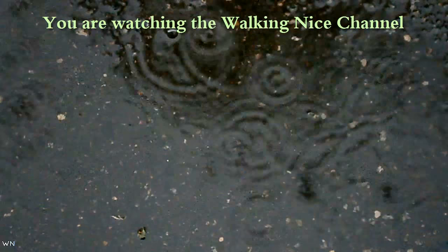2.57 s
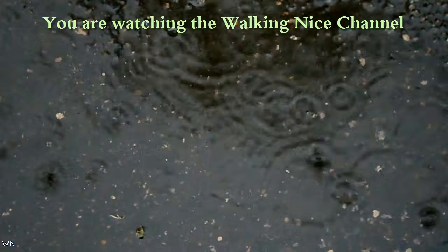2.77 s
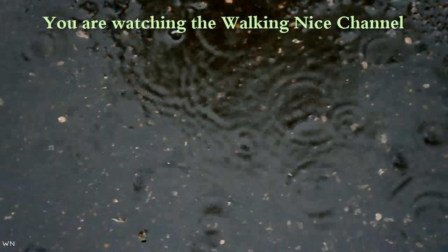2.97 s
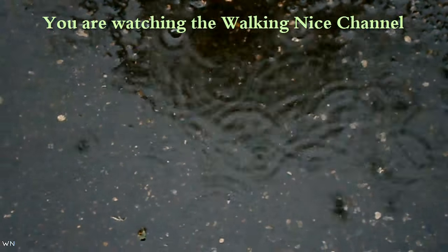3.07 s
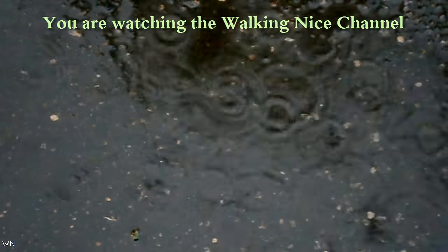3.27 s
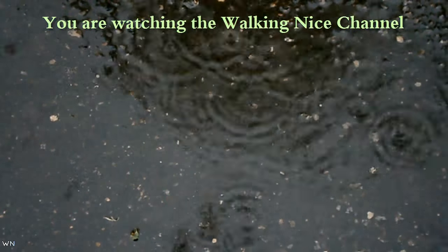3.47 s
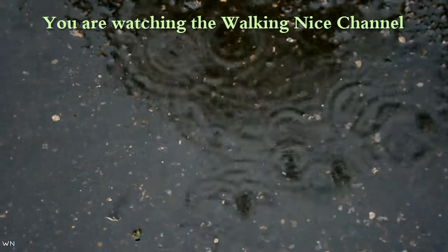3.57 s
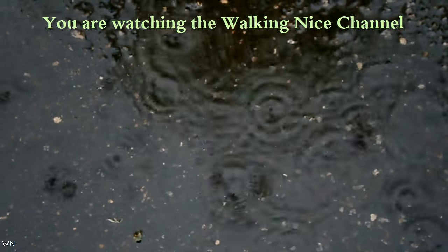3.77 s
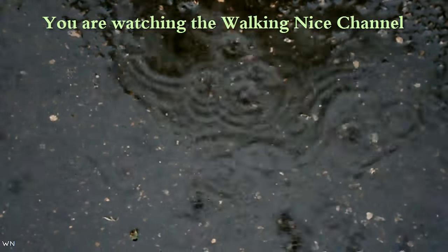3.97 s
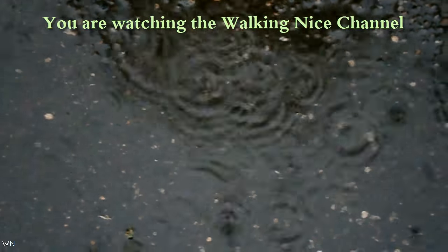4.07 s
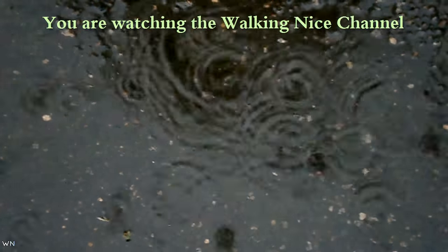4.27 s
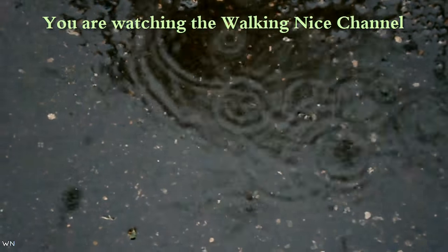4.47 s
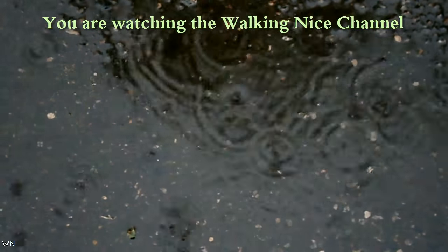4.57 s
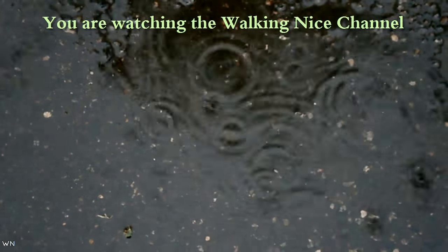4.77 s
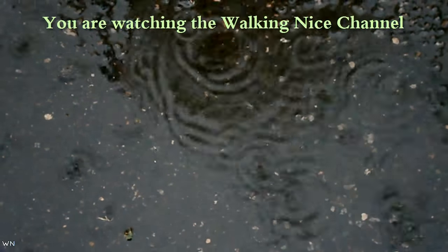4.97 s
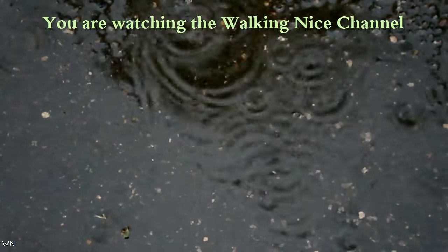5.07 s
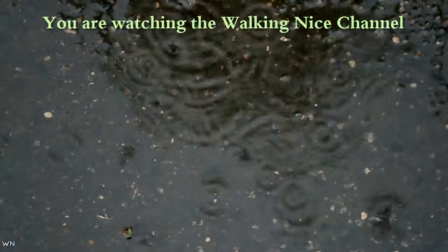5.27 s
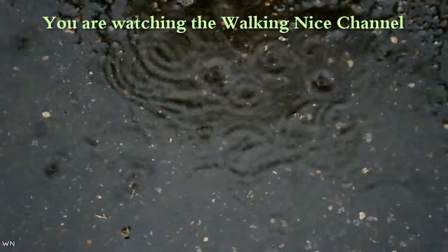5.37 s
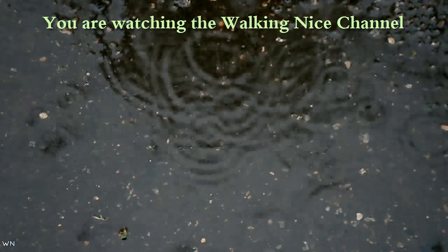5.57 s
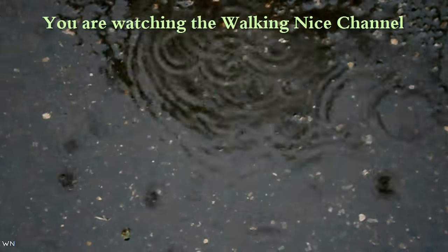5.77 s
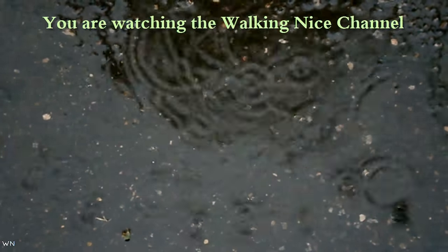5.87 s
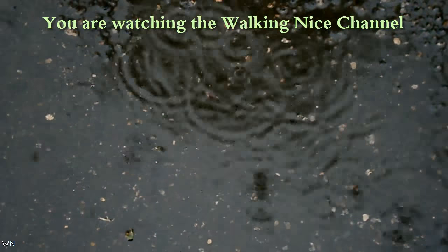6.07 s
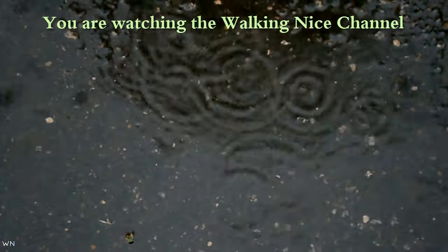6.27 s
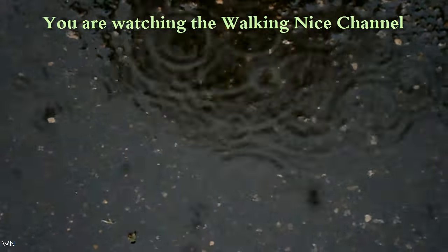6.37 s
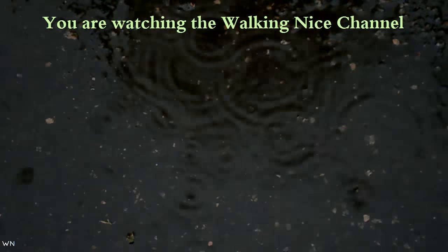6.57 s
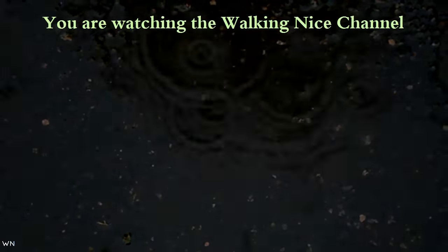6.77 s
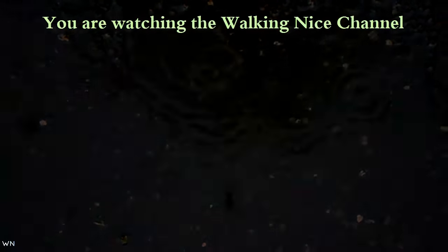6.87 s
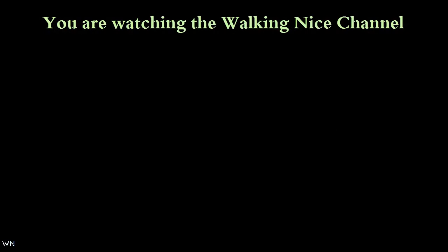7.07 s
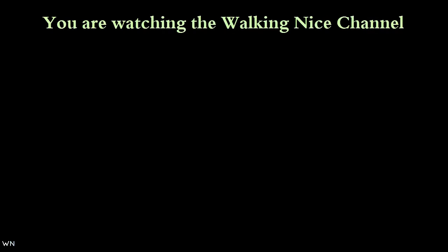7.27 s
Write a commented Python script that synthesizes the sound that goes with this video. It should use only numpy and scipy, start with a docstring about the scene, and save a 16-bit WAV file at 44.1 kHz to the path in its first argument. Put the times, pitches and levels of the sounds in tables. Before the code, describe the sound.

Outdoors, close mono pickup of rain on pavement: a continuous crackling patter, many sharp bright drop ticks with little sprays, lower wet splats in a puddle and occasional blunt thuds. Faint rising bubble blips surface briefly. A soft wash of distant rain stays underneath. The tone is coarse and grainy, like a cheap recorder, with no echo. The rain holds steady, then fades gradually until nothing remains.

```python
"""Steady rain on wet asphalt

Rain patters on asphalt and into a puddle, close to the microphone, and slowly fades out.
Near drops are short noise bursts that tick, splat and throw spray over a soft noise wash of rain further off.
A few heavy drops add a thud, made of one short push; trapped air bubbles ring as rising sine tones.
The recorder takes only 8000 samples a second and holds each one, which mirrors the ticks into a gritty treble."""
import sys
import numpy as np
from scipy import signal
from scipy.io import wavfile
from scipy.ndimage import uniform_filter1d, map_coordinates

SR = 44100
rng = np.random.default_rng(int(sys.argv[2]) if len(sys.argv) > 2 else 0)


def digitize_waveform(pressure):
    """Quantize a signal to 16-bit integers and store it at the path in sys.argv[1].

    Rows of a 2-D input are taken as channels; values are limited to [-1, 1].
    """
    field = np.atleast_2d(pressure).T
    bounded = np.clip(field, -1, 1)
    quanta = np.round(bounded * 32767).astype(np.int16)
    wavfile.write(sys.argv[1], SR, quanta)


N = 322812
TIME = np.arange(N) / SR

# All levels below are set before the recorder's overload and fade.
# Colour of the rain further off, overall level set apart: (frequency [Hz], relative level [dB])
WASH_COLOUR = [(15, -9), (35, -12.5), (100, -6.5), (220, -5), (420, -4.5), (750, 0.5), (1250, 1.5),
               (1520, -3), (2100, -0.5), (2600, -1.5), (3400, -3.5), (4000, 7), (4400, -48), (6000, -83)]
# Colour of a drop on wet asphalt, overall level set apart: (frequency [Hz], relative level [dB])
TICK_COLOUR = [(100, -31.5), (1500, -19.5), (2300, -14), (2600, -9.5), (2900, -5.5), (3400, 1), (3700, 2.5),
               (3900, 1.5), (4100, -18), (4400, -31.5), (6000, -69)]
# Colour of a drop in the puddle, overall level set apart: (frequency [Hz], relative level [dB])
SPLAT_COLOUR = [(40, -33.5), (300, -12), (900, -11.5), (1500, -1.5), (2200, 6), (2650, -8.5), (3300, 14),
                (4400, -45.5), (6000, -68.5)]
# Brief lulls in the near rain: (middle time [s], change in level [dB])
LULLS = [(0.47, -3.5), (0.66, -1), (1.41, -4), (1.95, -6), (2.45, -5), (2.63, -4.5), (4.35, -0.5),
         (4.94, -7.5), (5.27, -2.5), (5.63, -4.5)]
# How hard the small drops splash in the puddle: (time [s], level against the patter [dB])
PUDDLE_LEVEL = [(0, -13), (2.6, -13.5), (3.0, -8.5), (3.7, -9.5), (4.2, -11.5), (5.0, -16), (7.2, -7)]
# Air bubbles trapped in the puddle: (time [s], starting pitch [Hz], level [dB])
BUBBLES = [(1.472, 940, -33), (1.574, 753, -33), (1.722, 1025, -35), (1.76, 667, -28.5), (1.79, 872, -32),
           (2.872, 1950, -30), (3.839, 1250, -29), (5.37, 1660, -31), (5.408, 1590, -29),
           (5.527, 1290, -32), (5.76, 1630, -30), (6.271, 996, -29), (6.505, 1127, -26), (6.656, 1690, -32),
           (6.697, 1916, -28)]
# Heavy drops that land with a smack: (time [s], peak of the push [dB], length of the push [s])
THUDS = [(0.7499, -10, 0.00046), (2.3127, -22, 0.00056), (3.1393, -10.5, 0.00055), (3.2345, -18, 0.00033),
         (3.6686, -12.5, 0.0007), (4.859, -22, 0.00042), (6.8097, -11.5, .00035), (6.8176, -9, 0.00034)]
# The biggest near drops on the asphalt, before a shared boost: (time [s], level [dB])
BIG_TICKS = [(0.0775, -20), (0.0869, -33), (0.1946, -22.5), (0.3613, -22), (0.374, -23.5), (0.5945, -28),
             (0.7484, -20), (0.7731, -18), (0.8487, -25), (0.8772, -23), (1.095, -20), (1.125, -19),
             (1.1642, -21.5), (1.207, -20), (1.3084, -20.5), (1.4668, -24), (1.6172, -22), (1.6584, -22),
             (1.7369, -23), (1.8037, -20.5), (2.0117, -21), (2.2533, -23.5), (2.2939, -20), (2.3113, -19),
             (2.3903, -22), (2.5046, -22.5), (2.5563, -24), (2.588, -21.5), (2.8643, -17.5),
             (2.9063, -19.5), (3.0024, -19), (3.139, -18), (3.2021, -21.5), (3.2333, -21), (3.24, -20),
             (3.2561, -22), (3.2758, -18.5), (3.289, -21), (3.6676, -19), (3.6952, -21.5), (3.7607, -20.5),
             (3.8394, -23), (3.8909, -23.5), (3.9957, -24), (4.0142, -24.5), (4.032, -25), (4.0678, -24.5),
             (4.2655, -23.5), (4.3999, -18.5), (4.4274, -21), (4.4523, -23), (4.4969, -22.5), (4.6215, -20),
             (4.7844, -23.5), (4.8588, -19.5), (5.066, -21.5), (5.15, -21.5), (5.1583, -20.5),
             (5.3459, -20), (5.3838, -21.5), (5.4588, -22), (5.8125, -18.5), (5.8493, -22.5),
             (5.8846, -18.5), (5.9919, -21.5), (6.147, -15.5), (6.3765, -20.5), (6.5907, -22),
             (6.8187, -15.5)]
# The biggest near drops in the puddle: (time [s], level [dB])
BIG_SPLATS = [(0.0858, -26), (0.7491, -22), (0.849, -27), (1.2908, -23), (1.5281, -23), (1.6128, -22.5),
              (2.165, -25.5), (2.217, -21.5), (2.8769, -24.5), (2.9092, -34), (3.0018, -35), (3.1393, -24),
              (3.2344, -21), (3.524, -25), (3.6682, -21), (3.7175, -30), (5.0667, -25), (6.8083, -19)]

WASH_DB, PATTER_DB = -37, -31
LULL_S = 0.03  # a lull lasts about this long on either side of its middle
MIDDLING_PER_S, MIDDLING_SOFTEST_DB, MIDDLING_RANGE_DB = 19, -27.5, 4
SPRAY_LATEST_S, SPRAY_DB = 0.016, -6  # latest landing after the drop, level against the drop's table level
HOLD_HZ, EDGE_HZ = 8000, 15780  # the recorder's sample rate and its upper band limit


def gain_of(db):
    """Turns decibels into a multiplier for the wave."""
    return 10 ** (np.asarray(db) / 20)


def evened(x):
    """Scales a signal so that its average strength (rms) is 1."""
    return x / np.sqrt(np.mean(x ** 2) + 1e-20)


def colour_db(colour, hz):
    """Reads a colour table at any frequency, in even steps of pitch rather than of Hz."""
    table_hz, table_db = np.transpose(colour)
    return np.interp(np.log(hz + 1), np.log(table_hz + 1), table_db)


def add(mix, start_s, sound):
    """Mixes a sound in at its start time, cut off where the mix ends."""
    part = mix[max(round(start_s * SR), 0):][:len(sound)]
    part += sound[:len(part)]


def ring(colour, size=1024):
    """Makes a click with this colour whose energy comes as early as possible, like a real knock."""
    hz = abs(np.fft.fftfreq(size, 1 / SR))
    log_gain = np.log(gain_of(colour_db(colour, hz)))
    # the Hilbert transform finds the phase that lets nothing sound before the knock
    spectrum = np.exp(np.conj(signal.hilbert(log_gain)))
    return np.fft.ifft(spectrum).real[:size // 2]


def burst(response, decay_s, tail_db, tail_s, size=768):
    """One drop bursts: a hard push of noise, then a longer, softer tail."""
    t = np.arange(size) / SR
    envelope = np.exp(-t / decay_s) + gain_of(tail_db) * np.exp(-t / tail_s)
    noise = rng.standard_normal(size) * envelope
    sound = np.convolve(noise, response)
    # the loudest 1.5 ms get an rms of 1
    loudest_power = uniform_filter1d(sound ** 2, size=66).max()
    return sound / np.sqrt(loudest_power)


def tick(response, db):
    """One drop on the asphalt; a bigger drop takes longer to burst."""
    decay_s = np.interp(db, [-26, -18], [0.0008, 0.0016])
    return gain_of(db) * burst(response, decay_s, tail_db=-16, tail_s=0.0065)


def wash(patchy_db=1.92, size=1024):
    """Rain further off merges into a soft noise with drifting patches."""
    hz = np.fft.rfftfreq(size, 1 / SR)
    real, imag, patches = rng.standard_normal((3, len(hz), 4 * N // size + 5))
    # smoothing over pitch and then time makes neighbours swell together
    patches = uniform_filter1d(patches, size=8, axis=0)
    patches = evened(uniform_filter1d(patches, size=8, axis=1))
    level_db = colour_db(WASH_COLOUR, hz)[:, None] + patchy_db * patches
    spectrum = (real + 1j * imag) * gain_of(level_db)
    noise = signal.istft(spectrum, nperseg=size, noverlap=size - size // 4)[1][:N]
    return gain_of(WASH_DB) * evened(noise)


def lulls():
    """The near rain thins for a moment now and then, heard as a smooth dip in its level."""
    return gain_of(sum(db * np.exp(-((TIME - s) / LULL_S) ** 2) for s, db in LULLS))


def clumps(per_s, die_s):
    """Spray comes in sudden handfuls that die away; the result has mean 0 and rms 1."""
    starts = rng.random(N) < per_s / SR
    throws = signal.lfilter([1], [1, -np.exp(-1 / SR / die_s)], starts)
    return evened(throws - throws.mean())


def shower(response, per_s, spread_db, decay_s, count=48):
    """Drops of random size land at random moments, each with one of many burst shapes."""
    chance = rng.random(N)
    size = np.minimum(rng.exponential(1, N), 2)
    shape = rng.integers(0, count, N)
    bursts = [burst(response, decay_s, tail_db=-17, tail_s=0.003) for _ in range(count)]
    out = np.zeros(N)
    for at in np.flatnonzero(chance < per_s / SR):
        add(out, at / SR, gain_of(spread_db * size[at]) * bursts[shape[at]])
    return evened(out)


def patter(tick_db=-2, flurry_db=1.06):
    """Small drops and spray reach asphalt and water in quick handfuls and slower flurries."""
    handfuls_db = 1.3 * np.minimum(clumps(per_s=150, die_s=0.006), 2)
    flurries = np.minimum(clumps(per_s=50, die_s=0.025), 1.5)
    strength = gain_of(PATTER_DB + handfuls_db + flurry_db * flurries)
    ticks = shower(ring(TICK_COLOUR), per_s=1000, spread_db=2.5, decay_s=0.0005)
    splats = shower(ring(SPLAT_COLOUR), per_s=330, spread_db=6.0, decay_s=0.0011)
    puddle_db = np.interp(TIME, *np.transpose(PUDDLE_LEVEL))
    return strength * (gain_of(tick_db) * ticks + gain_of(puddle_db) * splats)


def middling_drops(count=300):
    """Drops between the big ones and the patter tick on the asphalt at random moments."""
    bright, out, s = ring(TICK_COLOUR), np.zeros(N), 0
    for wait, size in zip(rng.exponential(1, count), rng.random(count)):
        s += wait / MIDDLING_PER_S
        add(out, s, tick(bright, MIDDLING_SOFTEST_DB + MIDDLING_RANGE_DB * size))
    return out


def bubbles(t60=0.064, rise_per_s=0.73, swell_s=0.00088):
    """A trapped bubble rings and rises in pitch as it nears the surface."""
    t, out = np.arange(SR // 8) / SR, np.zeros(N)
    # a quick swell, then a fall of 60 dB in t60 seconds
    envelope = (1 - np.exp(-t / swell_s)) * np.exp(-np.log(1000) * t / t60)
    for s, hz, db in BUBBLES:
        cycles = hz * t * (1 + rise_per_s * t / 2)
        add(out, s, gain_of(db) * envelope * np.sin(2 * np.pi * cycles))
    return out


def thuds(rebound=0.04, crack_db=-11):
    """A heavy drop gives one short push that reaches into the bass; the water springs back and cracks."""
    body, out = ring(SPLAT_COLOUR), np.zeros(N)
    for s, db, push_s in THUDS:
        u = np.arange(100) / SR / push_s  # 0 to 1 is the push, 1 to 2 the weak spring back
        swing = np.sin(np.pi * u) * np.where(u < 1, 1, rebound) * (u < 2)
        add(out, s, -gain_of(db) * swing)
        crack = burst(body, decay_s=0.0013, tail_db=-13.5, tail_s=0.009)
        add(out, s + push_s, gain_of(db + crack_db) * crack)
    return out


def near_drops(tick_db=1.5, count=2):
    """Big drops on the asphalt tick brightly and throw spray droplets; drops in the puddle splat lower."""
    bright, body, out = ring(TICK_COLOUR), ring(SPLAT_COLOUR), np.zeros(N)
    for s, db in BIG_TICKS:
        add(out, s, gain_of(tick_db) * tick(bright, db))
        for flight in rng.random(count):
            add(out, s + SPRAY_LATEST_S * flight, tick(bright, db + SPRAY_DB))
    for s, db in BIG_SPLATS:
        add(out, s, gain_of(db) * burst(body, decay_s=0.0016, tail_db=-12, tail_s=0.006))
    return out


def scene():
    """Adds up the far wash, the near patter and the single drops, in mono."""
    near_rain = lulls() * (patter() + middling_drops())
    return (wash() + near_rain + bubbles() + thuds() + near_drops())[None]


def record(dry):
    """Soft overload, coarse sample-and-hold, a straight fade to silence, then the band limit."""
    sound = dry[0] / (1 + (dry[0] / 0.28) ** 6) ** (1 / 6)  # peaks level off towards 0.28
    last_sample_s = np.floor(TIME * HOLD_HZ) / HOLD_HZ
    # the steps mirror everything under 4 kHz around 8 and 16 kHz
    held = map_coordinates(sound, [last_sample_s * SR], order=3)
    fade = np.interp(TIME, [4.18, 7.225], [1, 0])
    low_pass = signal.firwin(511, EDGE_HZ, window=("kaiser", 9), fs=SR)
    return signal.oaconvolve(held * fade, low_pass, "same")[None]


dry = scene()
out = record(dry)
digitize_waveform(out)
```